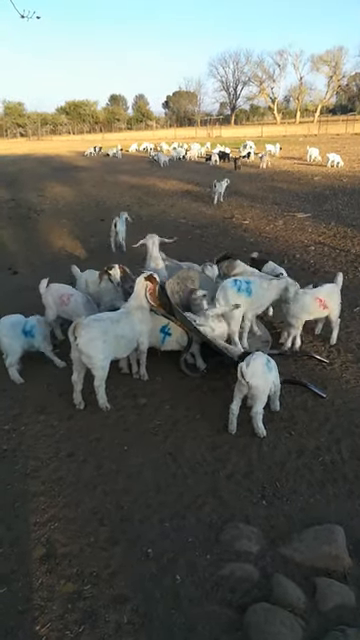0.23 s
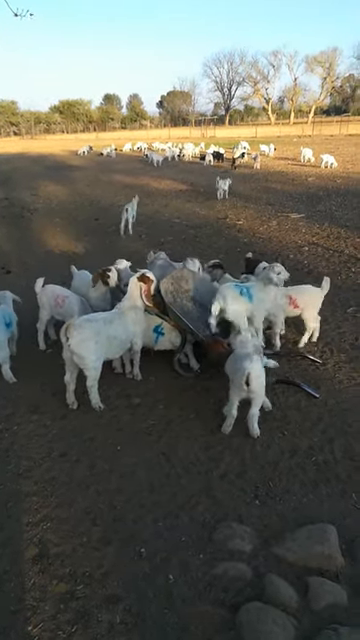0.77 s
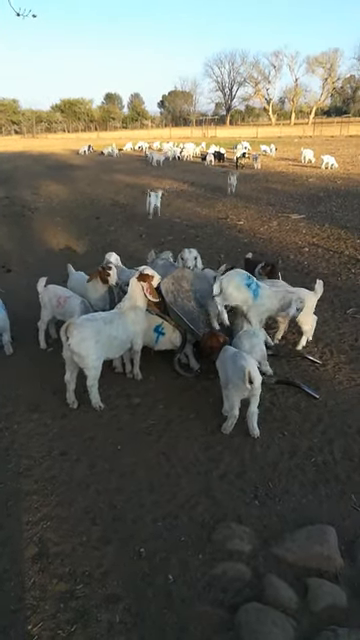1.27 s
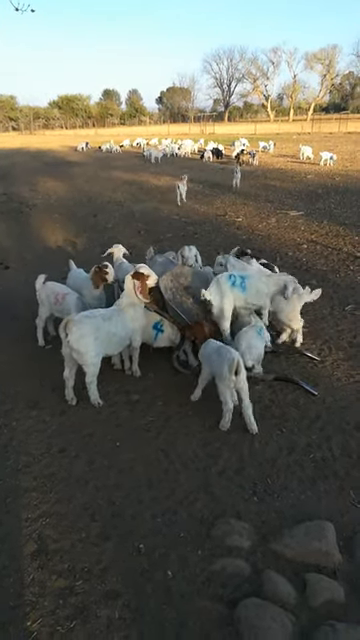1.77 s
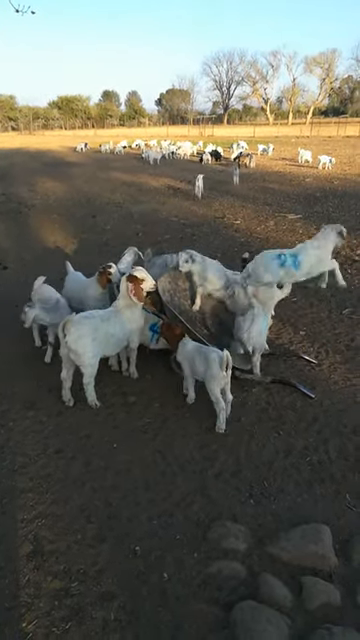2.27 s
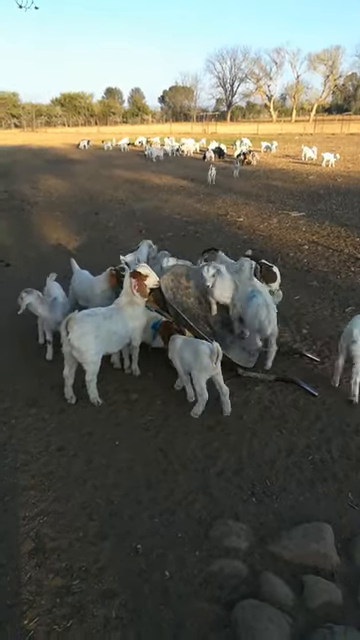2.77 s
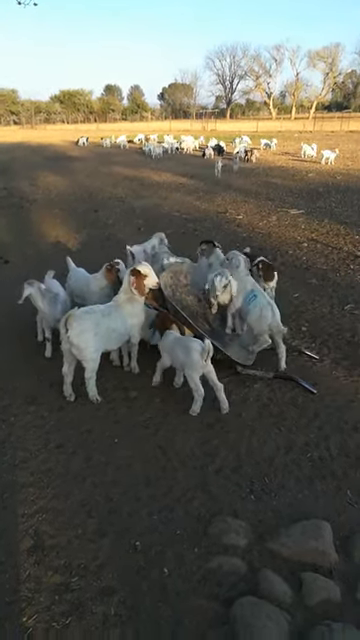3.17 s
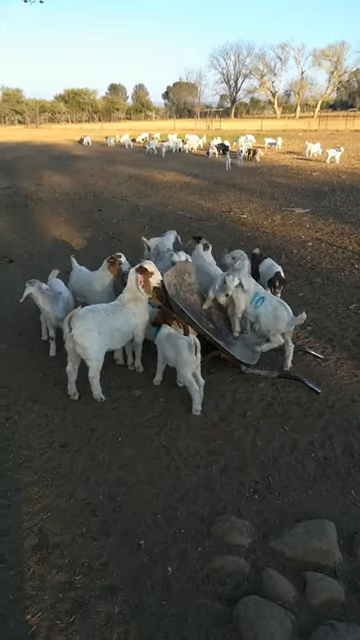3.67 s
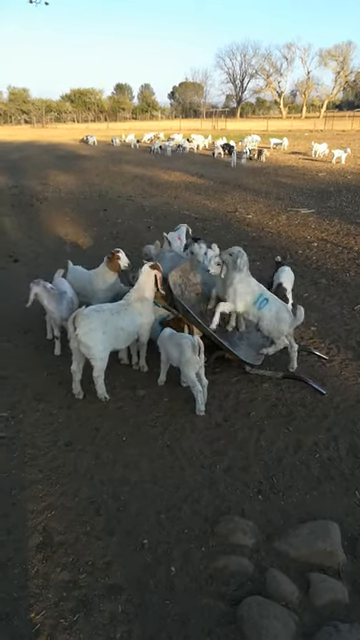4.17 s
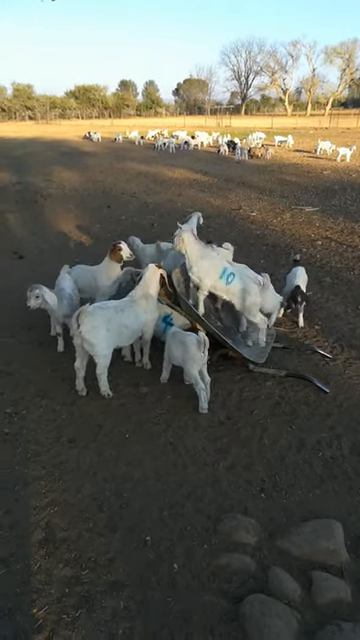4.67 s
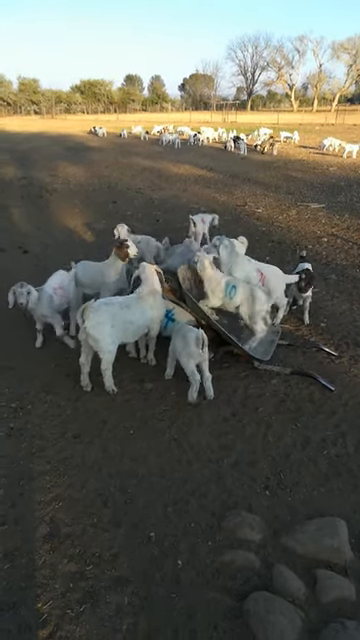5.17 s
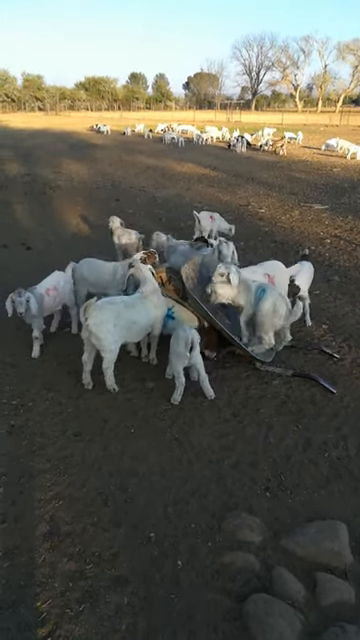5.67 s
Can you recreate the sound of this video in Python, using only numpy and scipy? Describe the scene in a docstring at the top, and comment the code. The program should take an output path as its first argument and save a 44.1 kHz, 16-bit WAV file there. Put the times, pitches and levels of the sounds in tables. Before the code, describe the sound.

Young goats clamber over a metal wheelbarrow, their hooves knocking and skidding, while a breeze rumbles and a small bird chirps faintly.

```python
"""An open paddock: goat kids clamber over a tipped steel wheelbarrow, a few metres from a phone.
Hooves boom the pan, clang the sheet and clack on the rim, then skid down the sandy steel in a
stick-slip scrape. A small bird chatters in short runs of whistles, shaken into a buzz.
A light breeze buffets the two microphones over the faint wash of the field."""
import sys
import numpy as np
from scipy import signal
from scipy.fft import rfft, irfft, next_fast_len
from scipy.io import wavfile
from scipy.ndimage import uniform_filter1d

SR = 44100
rng = np.random.default_rng(int(sys.argv[2]) if len(sys.argv) > 2 else 0)


def store_pcm(level_fs):
    """Save levels as 16-bit WAV."""
    pcm = np.round(np.clip(level_fs, -1, 1) * 32767).astype(np.int16)
    wavfile.write(sys.argv[1], SR, np.atleast_2d(pcm).T)


N = 261072

# hoof blows on the tray: t/s, clang/dB, boom/dB, tick/dB, boom centre/Hz, clang centre/Hz
HOOF_BLOWS = [(0.085, -30.5, -34, -45, 304, 810), (0.121, -45, -41.5, -64, 173, 1470),
              (0.17, -31.5, -49.5, -45, 267, 890), (0.189, -28, -39.5, -51, 159, 1000),
              (0.236, -35.5, -44, -61, 230, 1130), (0.474, -50.5, -38, -71, 247, 620),
              (0.503, -60, -38.5, -57, 265, 1820), (0.61, -36.5, -42, -50.5, 251, 1300),
              (0.726, -20.5, -35.5, -31, 350, 1370), (0.738, -23.5, -52, -42, 247, 1070),
              (0.78, -36, -38.5, -43, 253, 1420), (0.816, -48, -44, -71, 158, 1660),
              (0.921, -48.5, -76, -56, 207, 1240), (1.13, -41.5, -60, -54, 152, 1920),
              (1.173, -24.5, -32.5, -37.5, 271, 1380), (1.407, -33, -34.5, -49.5, 280, 900),
              (1.477, -32.5, -38, -47.5, 318, 1320), (1.502, -30.5, -42.5, -39.5, 260, 1650),
              (1.699, -31.5, -32.5, -47, 206, 1530), (1.905, -40, -40, -50.5, 250, 1170),
              (1.954, -48, -51.5, -60, 269, 1380), (2.048, -27, -37, -38.5, 318, 810),
              (2.09, -27.5, -79, -42, 274, 1290), (2.118, -36.5, -45.5, -42.5, 191, 1290),
              (2.243, -35, -34.5, -41.5, 236, 1060), (2.336, -36.5, -34, -49.5, 218, 1550),
              (2.695, -43, -48.5, -47.5, 280, 1270), (2.939, -28.5, -33.5, -45, 262, 1120),
              (3.178, -39, -39, -54, 217, 835), (3.206, -29.5, -35.5, -42.5, 206, 1780),
              (3.473, -40.5, -38.5, -60, 235, 790), (3.638, -30, -41, -37.5, 317, 1570),
              (4.096, -30.5, -37.5, -42, 256, 1080), (4.213, -41.5, -71, -44, 261, 1530),
              (4.271, -40.5, -43.5, -51, 190, 1160), (4.395, -34, -39, -44.5, 283, 1440),
              (4.45, -31.5, -36.5, -49, 232, 1110), (4.511, -31, -48, -38.5, 288, 1300),
              (4.567, -26.5, -36, -37.5, 285, 1730), (4.69, -30.5, -39.5, -50, 377, 1300),
              (4.845, -18.5, -40.5, -37, 298, 1430), (4.896, -24, -30, -30, 262, 880),
              (4.929, -33, -40, -39, 157, 770), (4.983, -33, -33, -64, 357, 845),
              (5.022, -25.5, -35, -36.5, 350, 680), (5.111, -28.5, -38, -31.5, 212, 1880),
              (5.558, -44, -33.5, -54, 267, 1390), (5.888, -51.5, -47, -59, 397, 760)]


def knocks(boom_db=-2, clang_db=-9, tick_db=-1):
    """A soft tread mostly booms the pan; a hard hoof edge clangs and ticks."""
    # a heavy landing keeps the hoof down and damps the sheet: clang/dB, ring length/ratio
    damping = [(-26, 0.71), (-23.5, 0.64)]
    spots = [(boom_hz, clang_hz, np.interp(db, *np.transpose(damping)))
             for _, db, _, _, boom_hz, clang_hz in HOOF_BLOWS]
    out = np.zeros((2, N))
    for (s, mid, low, high, *_), (boom, clang, tick) in zip(HOOF_BLOWS, tray_rings(spots)):
        hit = undb(low + boom_db) * boom + undb(mid + clang_db) * clang + undb(high + tick_db) * tick
        add(out, hit, s)
    return out


def tray_rings(spots, ring_s=.6, sheet_t60=.32, thud_db=-6, notes_db=-5, bright_db=-6, snap_db=11):
    """The steel's boom, clang and tick for each struck spot (boom/Hz, clang/Hz, ring length/ratio)."""
    # free-ringing modes: f/Hz, level/dB, t60/s
    pan_modes = [(144.3, -17, 0.57), (199, -2, 0.33), (238.4, -2, 0.39), (261, -9.5, 0.41),
                 (293.2, -2.5, 0.25), (319.9, -4.5, 0.25), (353.1, 2, 0.14), (403.3, -5, 0.17),
                 (475, -9.5, 0.36)]  # the whole pan bending
    sheet_modes = [(601, -10.5, 1), (660.4, -6.5, 0.33), (708, -4, 0.87), (807, -3.5, 0.17),
                   (896, -4, 0.32), (965, -10, 0.42), (1096, -7.5, 0.44), (1288, 3.5, 0.31),
                   (1332, 1, 0.07), (1420, -4.5, 0.28), (1505.6, 2, 0.21), (1622, -7.5, 0.4),
                   (1930, -5, 0.14), (2180, -0.5, 0.08), (2319, -4, 0.28)]  # clear notes of the sheet
    bright_modes = [(3134, -11, 0.55), (3240, -19.5, 0.14), (3250, 4, 0.064), (3416, -2.5, 0.22),
                    (3667, 6.5, 0.053), (3960, -0.5, 0.14), (4130, -4, 0.17), (4660, -17, 0.054),
                    (4900, 2.5, 0.06), (5190, -3, 0.1)]  # its high notes
    # noise colours: f/Hz, level/dB
    thud_colour = [(70, -5), (130, 2), (280, 1.5), (420, -3.5), (700, -14), (2000, -60)]  # dull push into the pan
    clang_colour = [(330, -36), (520, -2), (720, 1.5), (950, -2.5), (1300, -3.5), (1620, 2), (1950, -3.5),
                    (2250, -2.5), (2600, -17), (3300, -35)]  # crowded modes of the sheet
    tick_colour = [(2000, -35), (2600, -5.5), (3250, 4.5), (3700, 4.5), (4400, -8.5), (5200, -3),
                   (7000, -11), (8400, -24.5), (10500, -32.5), (15500, -33)]  # hoof edge on steel
    t = np.arange(int(ring_s * SR)) / SR
    boom_attack = 1 - np.exp(-t / .00064)
    spread = 1 - np.exp(-t / .00026)  # bending waves take a moment to fill the sheet
    for boom_hz, clang_hz, length in spots:
        held = fade(t, sheet_t60) ** (1 / np.clip(length, .25, 1.6) - 1)  # the hoof damps the ring
        thud = spot_colour(noise(thud_colour, len(t)), boom_hz, focus_db=22) * fade(t, t60=.47)
        boom = notes(pan_modes, t, boom_hz, focus_db=22) + undb(thud_db) * struck(thud)
        wash = spot_colour(noise(clang_colour, len(t)), clang_hz, focus_db=5) * fade(t, sheet_t60)
        clang = struck(wash) + undb(notes_db) * notes(sheet_modes, t, clang_hz, focus_db=5)
        edge = spot_colour(noise(tick_colour, len(t)), clang_hz, focus_db=0)
        edge *= fade(t, t60=.097) + undb(snap_db) * fade(t, t60=.28)
        tick = struck(edge) + undb(bright_db) * notes(bright_modes, t, clang_hz, focus_db=0)
        yield struck(boom_attack * boom), struck(spread * held * clang), struck(spread * held * tick)


def spot_colour(x, centre_hz, focus_db, patchy_db=4, patch_hz=130):
    """The struck spot favours one band, with humps and dips where modes have bellies and nodes."""
    hz = np.maximum(np.fft.rfftfreq(x.shape[-1], 1 / SR), 1)
    humps = np.interp(hz / patch_hz, np.arange(400), rng.standard_normal(400))
    away = np.minimum(np.log2(hz / centre_hz) ** 2, 2)
    return irfft(rfft(x) * undb(patchy_db * humps - focus_db * away), x.shape[-1])


def notes(table, t, centre_hz, focus_db, scatter_db=4):
    """Each clear mode is a decaying sine that takes its own share of the blow."""
    hz, db, t60 = np.transpose(table)[:, :, None]
    sines = undb(db) * fade(t, t60) * np.sin(2 * np.pi * hz * t)
    away = np.log2(hz[:, 0] / centre_hz) ** 2
    share = undb(scatter_db * rng.standard_normal(len(hz)) - focus_db * away)
    return struck((rng.choice([-1, 1], len(hz)) * share) @ sines)


def skids(scrape_db=1, rasp_db=-7, rasp_grit_db=9, grit_db=7, wander_db=8, judder_db=2.5):
    """Sliding hooves catch, slip and grind sand; shifting weight drums the pan and rubs faintly."""
    # spots the hooves wander over: boom/Hz, clang/Hz, ring length/ratio
    spots = [(198, 1520, 0.35), (300, 1180, 0.2), (260, 1410, 0.13), (350, 1070, 0.28)]
    # weight shifting on the pan: t/s, level/dB
    shuffle = [(0.0, -39.5), (0.42, -53), (0.56, -44.5), (0.75, -64), (1.0, -63), (1.3, -57), (1.5, -55.5),
               (1.87, -57.5), (2.35, -47.5), (2.85, -53), (3.1, -62.5), (3.3, -56), (3.67, -57),
               (4.05, -65.5), (4.33, -54), (5.08, -43), (5.36, -70.5), (5.92, -70)]
    # sand grinding under a hoof: f/Hz, level/dB
    grit_colour = [(2000, 4.5), (3500, 0), (4400, 10.5), (5500, 13.5), (7000, 8), (8500, 2.5),
                   (10500, -5.5), (15500, -5)]
    judder = undb(judder_db * walk(rate=45))  # the pressure comes in jerks
    weight = undb(curve(shuffle))
    rubbing = undb([[-10], [-20]]) * weight  # into scrape, into grit
    scrape, grit = np.hypot(skid_levels(), rubbing) * judder
    rasp = np.hypot(scrape * undb(rasp_db), grit * undb(rasp_grit_db))
    drives = weight, scrape * undb(scrape_db), rasp  # excite boom, clang, tick
    shares = undb(wander_db * np.array([walk(rate=16) for _ in spots]))
    shares /= np.linalg.norm(shares, axis=0)
    out = np.zeros((2, N))
    for share, rings in zip(shares, tray_rings(spots)):
        catches = share * slips(rate=450, scatter_db=3.5)
        for ring, drive in zip(rings, drives):
            unit_ring = ring / np.sqrt(np.sum(ring ** 2) / 2)
            out += signal.oaconvolve((catches * drive)[None], unit_ring, axes=1)[:, :N]
    return out + noise(grit_colour, N) * grit * undb(grit_db + 1.16 * walk(rate=650))


def skid_levels(rise_share=.42, release_t60=.38):
    """Scrape and grit envelopes: each skid builds, holds and runs out."""
    # slides down the tray: start/s, length/s, scrape/dB, grit/dB
    slides = [(0.0, 0.0083, -41, -58), (0.038, 0.027, -44.5, -64), (0.143, 0.14, -52.5, -59),
              (0.499, 0.072, -47.5, -77), (0.649, 0.18, -53.5, -61.5), (1.404, 0.041, -50.5, -85),
              (1.51, 0.13, -62, -67), (1.71, 0.045, -58.5, -68), (1.929, 0.064, -44.5, -60),
              (2.084, 0.091, -43, -59.5), (2.156, 0.17, -48.5, -80), (2.369, .13, -51, -60),
              (2.479, 0.27, -47.5, -57.5), (2.721, 0.16, -46, -57), (3.235, 0.06, -56, -73.5),
              (3.502, 0.13, -56.5, -64.5), (3.648, 0.087, -48.5, -63), (3.764, 0.16, -59, -63),
              (4.232, 0.091, -49.5, -57.5), (4.452, 0.041, -47, -56.5), (4.652, 0.022, -55, -60.5),
              (4.737, 0.23, -50.5, -71), (4.862, 0.047, -39, -77), (4.93, 0.12, -45, -65.5),
              (5.078, 0.15, -54.5, -66), (5.23, 0.092, -59.5, -69.5), (5.359, 0.23, -48, -61.5),
              (5.633, 0.14, -61, -66.5)]
    t = np.arange(SR) / SR
    power = np.zeros((2, N))
    for s, length, *db in slides:
        shape = np.minimum(t / (rise_share * length), 1) * fade(np.maximum(t - length, 0), release_t60)
        add(power, (undb(db)[:, None] * shape) ** 2, s)
    return np.sqrt(power)


def slips(rate, scatter_db):
    """Stick-slip catches of uneven size, mean power 1."""
    count = int(rate * N / SR)
    times, size, sign = rng.random((3, 20000))[:, :count]
    kicks = np.sign(sign - .5) * undb(-scatter_db * np.log(size + .11))
    train = np.bincount((times * N).astype(int), kicks, N)
    return train / train.std()


def cracks(crack_db=-9, growth=1.9):
    """Hard blows crush sand against the steel; the crack grows faster with force than the tick."""
    # crushed sand: f/Hz, level/dB
    colour = [(2000, -9), (3500, 1.5), (8500, -2), (10500, -21.5), (15500, -21)]
    out = np.zeros((2, N))
    t = np.arange(SR // 10) / SR
    hardest = max(row[3] for row in HOOF_BLOWS)
    for s, _, _, tick_db, *_ in HOOF_BLOWS:
        burst = struck(noise(colour, len(t)) * fade(t, t60=.042))
        add(out, undb(hardest + growth * (tick_db - hardest) + crack_db) * burst, s)
    return out


def raps(ring_length=.37, clang_db=-9, tick_db=-19):
    """A hoof that catches the stiff rim gives a short clack without any boom."""
    # raps on the rim: t/s, level/dB, centre/Hz
    rim_raps = [(2.647, -40.5, 1300), (3.398, -48.5, 2050), (4.171, -32, 1600)]
    spots = [(hz, hz, ring_length) for _, _, hz in rim_raps]
    out = np.zeros((2, N))
    for (s, db, _), (_, clang, tick) in zip(rim_raps, tray_rings(spots)):
        add(out, undb(db + clang_db) * clang + undb(db + tick_db) * tick, s)
    return out


def bird(length_s=.098, arch_s=.035, arch_hz=460, buzz_hz=375, swing_hz=850, song_db=-1, echo_db=-11):
    """Each syllable is an arching whistle, shaken so fast that it splits into a buzzy comb."""
    out = np.zeros((2, N))
    t = np.arange(int(length_s * SR)) / SR - length_s / 2
    for s, hz, db in syllables():
        shake = 2 * np.pi * buzz_hz * rng.uniform(.94, 1.06) * t
        waver = np.interp(t, np.linspace(t[0], t[-1], 40), rng.standard_normal(40))
        arch = arch_hz * (np.exp(-(t / arch_s) ** 2) - 1)
        pitch = hz + arch + swing_hz * (np.sin(shake) + .14 * waver)
        envelope = (1 + np.cos(shake)) * np.sqrt(np.hanning(len(t)))
        note = np.sin(2 * np.pi * np.cumsum(pitch) / SR) * envelope
        add(out, undb(db + song_db) * note / note.std(), s - length_s / 2)
    # trees and ground scatter a little of it
    tail = rng.standard_normal((2, SR // 4)) * fade(np.arange(SR // 4) / SR, t60=.35)
    return out + undb(echo_db) * signal.fftconvolve(out, tail / np.linalg.norm(tail[0]), axes=1)[:, :N]


def syllables(pace_s=.083, fade_db_per_s=12):
    """Evenly paced syllables (t/s, f/Hz, level/dB): pitch drifts and level sinks through each run."""
    # runs of song: first t/s, last t/s, first f/Hz, last f/Hz, first level/dB
    runs = [(0.264, 0.429, 5080, 4700, -57), (3.749, 4.179, 5650, 6130, -54.5),
            (5.675, 5.821, 5650, 5920, -60)]
    for first_s, last_s, first_hz, last_hz, db in runs:
        count = round((last_s - first_s) / pace_s) + 1
        times = np.linspace(first_s, last_s, count)
        pitches = np.linspace(first_hz, last_hz, count)
        yield from zip(times, pitches, db - fade_db_per_s * (times - first_s))


def wind(breeze_db=-1, swirl_db=3, gust_db=-1):
    """Eddies thump on the microphones, harder in each gust."""
    # the underlying breeze: t/s, level/dB
    breeze_levels = [(0.0, -35.5), (0.48, -49.5), (0.92, -44.5), (1.2, -57), (1.43, -47.5), (1.58, -50),
                     (2.51, -52), (2.7, -41.5), (2.8, -69), (3.36, -64.5), (4.95, -57), (5.92, -67.5)]
    # gusts that swell and die evenly: peak t/s, width/s, level/dB
    swells = [(0.035, 0.019, -32), (0.098, 0.03, -33), (0.18, 0.017, -31), (0.42, 0.05, -39),
              (0.659, 0.044, -28.5), (0.823, 0.023, -30), (1.05, 0.038, -39.5), (1.14, 0.041, -37.5),
              (1.55, 0.036, -42), (1.75, 0.12, -41), (1.91, .06, -46.5), (2.16, 0.094, -38),
              (2.52, 0.035, -44), (2.64, 0.035, -35.5), (2.8, 0.095, -42.5), (3.03, .05, -53),
              (3.19, 0.046, -41), (3.47, 0.071, -52), (4.05, 0.043, -49.5), (4.169, 0.02, -37),
              (4.5, 0.19, -47), (4.96, .04, -43.5), (5.17, 0.16, -57), (5.35, 0.019, -45)]
    # low buffeting: f/Hz, level/dB
    colour = [(15, -11), (35, 4.5), (70, 1.5), (115, -0.5), (160, -9.5), (300, -38), (900, -57.5)]
    t = np.arange(N) / SR
    eddies = noise(colour, N)
    eddies /= np.sqrt(uniform_filter1d(np.mean(eddies ** 2, axis=0), size=2000))  # even out the level
    gusts = sum(undb(db + gust_db) * np.exp(-2 * ((t - s) / width) ** 2) for s, width, db in swells)
    breeze = undb(curve(breeze_levels) + breeze_db + swirl_db * walk(rate=14))
    return eddies * np.hypot(gusts, breeze)


def paddock(level_db=-64, drift_db=2):
    """The open field: a faint, slowly drifting bed of noise."""
    # field ambience: f/Hz, level/dB
    colour = [(30, 21.5), (250, 7), (550, -52), (1500, -41), (2600, 2), (3600, -52), (7000, -10),
              (10000, -12.5), (15500, -16)]
    return noise(colour, N) * undb(level_db + drift_db * walk(rate=3.3))


def noise(colour, size):
    """Coloured stereo noise of rms 1, wider in the treble."""
    # how alike the two microphones hear: f/Hz, correlation
    likeness = [(100, 0.93), (330, 0.8), (500, 0.17), (800, 0.47), (1400, 1), (2200, 0.42), (3500, 0.24),
                (5000, 0.063), (9000, 0.086), (15000, 0.081)]
    alike = np.clip(over_hz(likeness, size)[0], 0, 1)
    mid, side = rfft(rng.standard_normal((2, size)))
    pair = np.sqrt(1 + alike) * mid + np.sqrt(1 - alike) * side * np.array([[1], [-1]])
    out = irfft(pair * undb(over_hz(colour, size)[0]), size)
    return out / out.std()


def undb(db):
    """Decibels to gain."""
    return 10 ** (np.asarray(db) / 20)


def curve(table):
    """A time table, sample by sample."""
    return np.interp(np.arange(N) / SR, *np.transpose(table))


def over_hz(table, size):
    """The columns of a frequency table on the bins of a transform."""
    hz, *columns = np.transpose(table)
    bins = np.log(np.maximum(np.fft.rfftfreq(size, 1 / SR), 1))
    return [np.interp(bins, np.log(hz), c) for c in columns]


def walk(rate):
    """Random wander with a spread near 1, at rate steps a second."""
    steps = np.arange(N) / SR * rate
    return np.interp(steps, np.arange(N // 10), rng.standard_normal(N // 10))


def fade(t, t60):
    """Exponential decay, 60 dB down after t60."""
    return np.exp(-np.log(1000) * t / t60)


def struck(x):
    """Scale a ring to rms 1 over its first 30 ms."""
    return x / np.sqrt(np.mean(x[..., :int(.03 * SR)] ** 2))


def add(out, sound, s):
    """Mix a sound in at time s."""
    start = max(int(s * SR), 0)
    out[:, start:start + sound.shape[-1]] += sound[..., :max(N - start, 0)]


def scene():
    """Hooves on the wheelbarrow, the bird and the open air."""
    return knocks() + skids() + bird() + wind() + paddock() + cracks() + raps()


def record(dry):
    """The phone's body colours and delays its two microphones differently; the top is cut."""
    # the microphone pair: f/Hz, left minus right/dB, phase lead of the left/rad
    microphones = [(150, 0, 0), (260, 0, -.4), (420, -5, -.9), (510, 0, 1.9), (630, 7, 0), (800, -1.5, -.3),
                   (1020, .5, .4), (1300, -1, -.2), (1900, -4, .3), (2450, -.5, 0), (2900, -3, -1),
                   (3750, -11, .7), (4600, -1, .8), (5300, -2.5, .6), (6800, 5, .6), (8500, 0, .7)]
    size = next_fast_len(N + SR // 4)
    balance_db, lead = over_hz(microphones, size)
    side = np.array([[1], [-1]]) / 2
    gain = undb(side * balance_db)
    response = gain / np.sqrt(np.mean(gain ** 2, axis=0)) * np.exp(1j * side * lead)
    heard = irfft(rfft(dry, size) * response, size)[:, :N]
    top_cut = signal.ellip(10, .2, 80, 15900, fs=SR, output="sos")
    return signal.sosfilt(top_cut, heard)


dry = scene()
out = record(dry)
store_pcm(out)
```